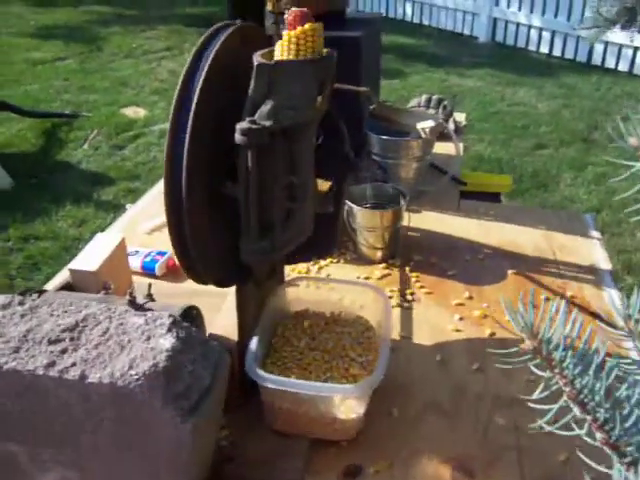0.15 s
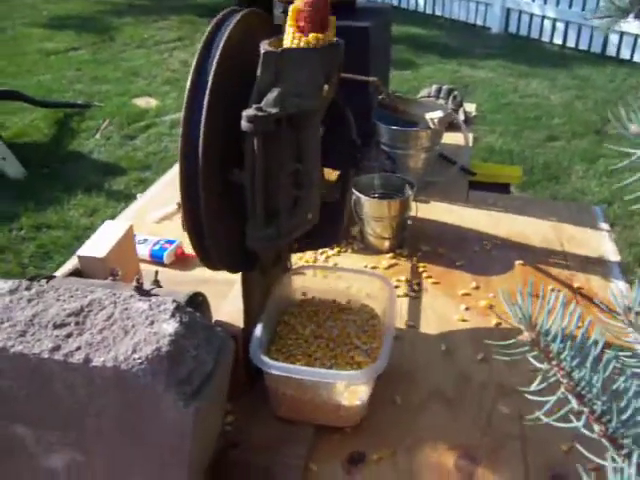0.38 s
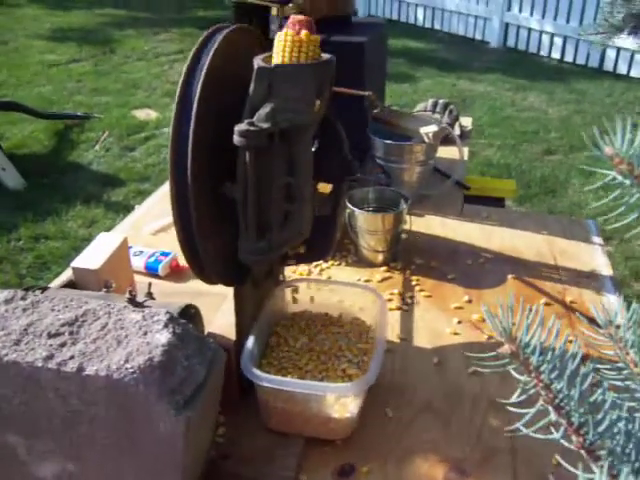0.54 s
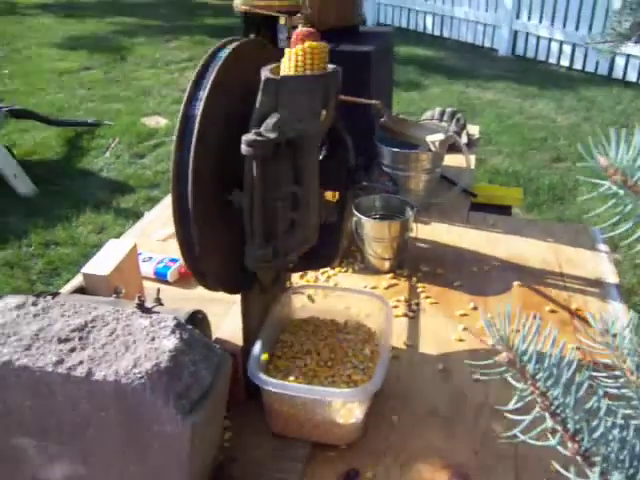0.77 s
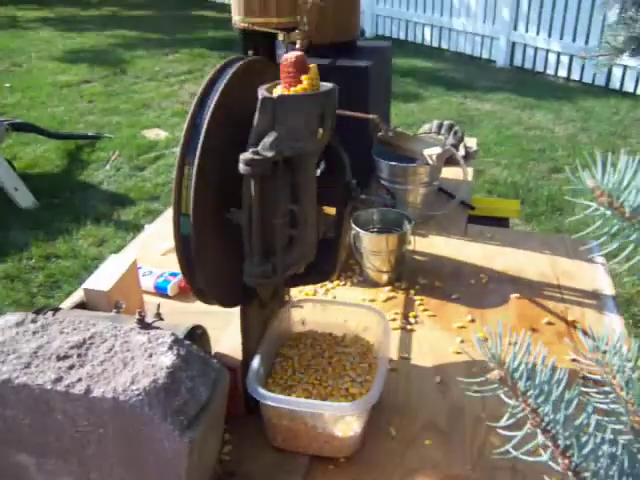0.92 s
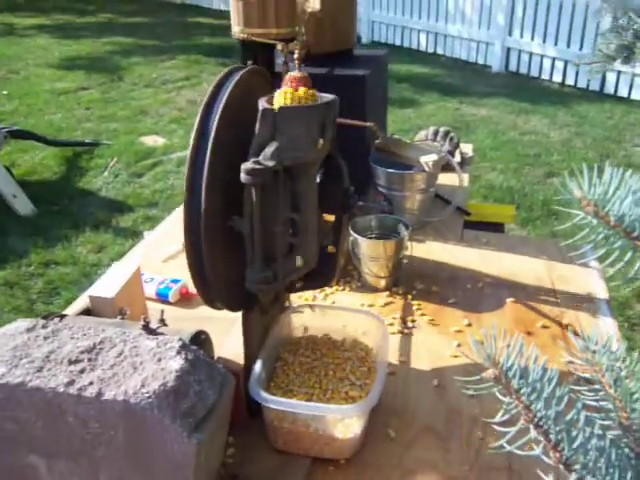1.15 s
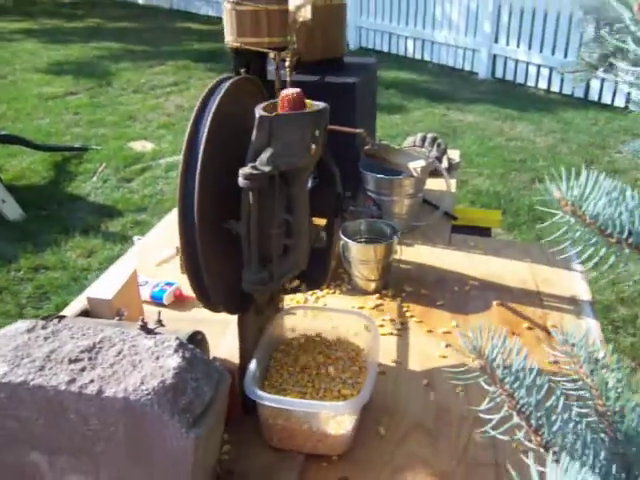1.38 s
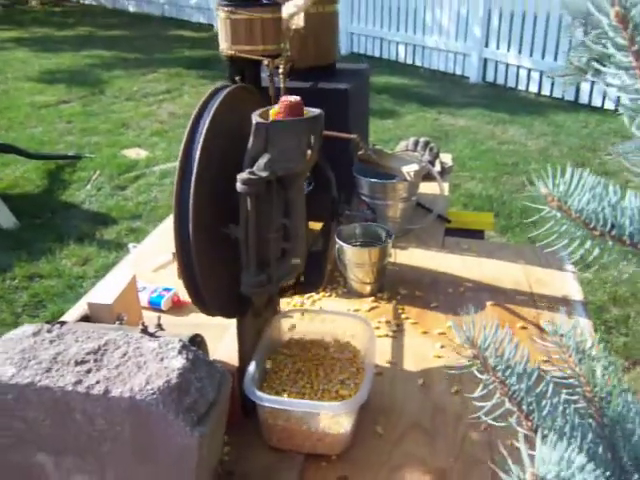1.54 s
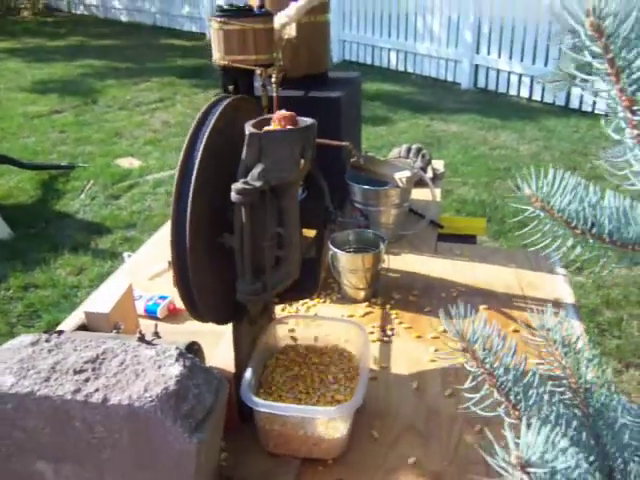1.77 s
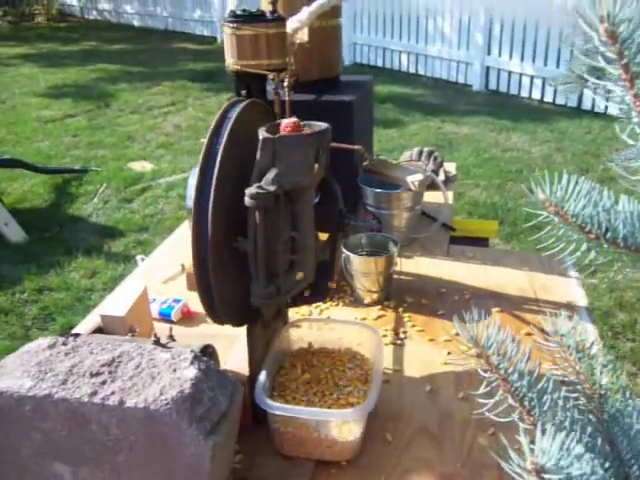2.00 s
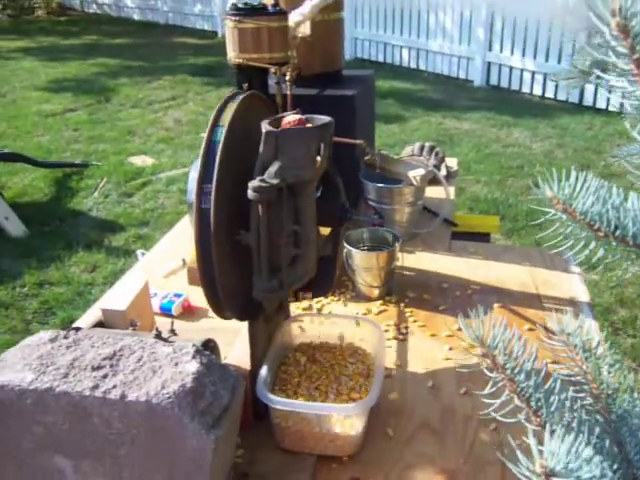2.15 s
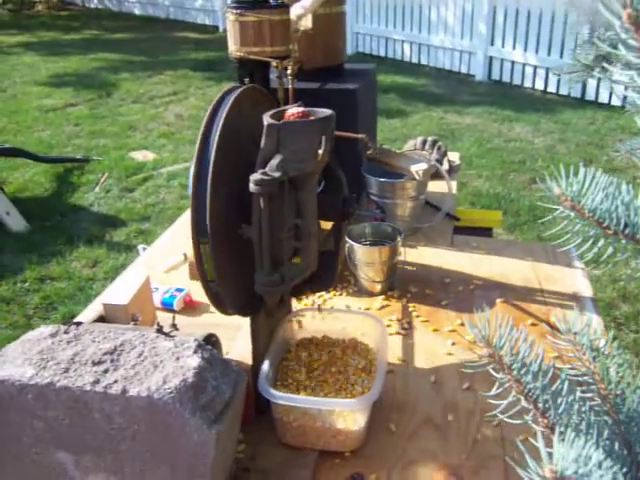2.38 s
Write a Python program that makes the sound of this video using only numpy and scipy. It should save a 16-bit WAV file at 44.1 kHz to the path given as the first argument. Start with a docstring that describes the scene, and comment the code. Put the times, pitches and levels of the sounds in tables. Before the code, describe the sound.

A corn sheller grinds a dry cob in fast, uneven, grainy bites with ringing iron, short squeals and sharp kernel snaps; wooden table thumps beneath, faint steam hiss, outdoors, close small camera microphone with dull treble.

```python
"""Steam-driven corn sheller

A small steam engine turns a cast-iron corn sheller. Teeth bite along a dry ear in bursts of grainy rasp and set
the iron ringing; now and then a disc mode squeals. Kernels snap off as short splintery clicks with an echo
off the table top, stray pieces knock and ping, and the cob scrunches and cracks as filtered grains.
The wooden table thumps and shakes in its own modes, over shaped-noise drive rumble and a steady hiss of steam."""
import sys
import numpy as np
from scipy import signal
from scipy.fft import rfft, irfft, next_fast_len
from scipy.io import wavfile
from scipy.ndimage import map_coordinates

SR = 44100
rng = np.random.default_rng(int(sys.argv[2]) if len(sys.argv) > 2 else 0)


def pcm_store(signal):
    """Save signal as 16-bit PCM."""
    levels = np.round(np.clip(np.atleast_2d(signal), -1, 1) * 32767)
    wavfile.write(sys.argv[1], SR, levels.astype(np.int16).T)


N = 111132  # length [samples]

# Levels in the tables are those ahead of each layer's trim and the microphone.
# How hard the disc grinds: (time [s], level [dB])
GRIND_LEVEL = [(0, -13), (0.035, -25.5), (0.07, -33), (0.125, -25), (0.185, -23.5), (0.24, -32),
               (0.272, -22), (0.315, -29), (0.405, -25.5), (0.435, -26.5), (0.46, -23.5), (0.515, -32),
               (0.545, -35.5), (0.6, -29), (0.64, -27.5), (0.705, -25.5), (0.785, -26), (0.805, -35),
               (0.865, -23), (0.93, -22), (0.96, -28), (1.02, -26.5), (1.075, -26), (1.16, -25.5),
               (1.25, -25), (1.305, -31.5), (1.35, -28), (1.42, -24.5), (1.485, -34.5), (1.57, -31),
               (1.65, -27.5), (1.79, -30.5), (1.96, -26), (2.1, -27.5), (2.175, -25), (2.2, -35),
               (2.23, -32.5), (2.26, -20.5), (2.295, -34), (2.35, -26.5), (2.385, -37), (2.425, -38.5),
               (2.455, -30), (2.52, -35.5)]
# Kernels snapping off and striking: (time [s], peak [dB], centre [Hz], length [s])
KERNEL_SNAPS = [(0.0514, -7.5, 5300, 0.0087), (0.119, -9.5, 4630, 0.0076), (0.1957, -11.5, 4660, 0.0053),
                (0.385, -17.5, 3230, 0.0064), (0.4594, -12.5, 4500, 0.0034), (0.486, -2.5, 3510, 0.0077),
                (0.5044, -5.5, 4790, 0.01), (0.531, -9, 4300, 0.0046), (0.5887, -12.5, 3480, 0.0046),
                (0.7853, -9.5, 3980, 0.004), (0.7912, -1, 3510, 0.0036), (0.941, -9, 4270, 0.0017),
                (0.9715, -5.5, 3700, 0.0033), (1.01, -12.5, 4080, 0.0104), (1.094, -1, 4350, 0.0055),
                (1.236, -9.5, 4620, 0.0045), (1.332, -7.5, 3990, 0.016), (1.3735, -8.5, 4300, 0.004),
                (1.4518, -1, 4100, 0.0062), (1.4677, -4.5, 4300, 0.004), (1.5006, -5, 4300, 0.0056),
                (1.51, -8.5, 4180, 0.013), (1.59, -10.5, 4220, 0.0078), (1.632, -13.5, 3800, 0.0036),
                (1.6496, -8, 3980, 0.0065), (1.717, -6.5, 4400, 0.0028), (1.81, -14.5, 3610, 0.0051),
                (1.8435, -10.5, 3250, 0.0053), (1.8563, -10, 4480, 0.0035), (1.909, -4, 3500, 0.0041),
                (2.023, -4, 4400, 0.011), (2.1403, -12, 3880, 0.008), (2.1866, -7, 3560, 0.0053),
                (2.273, -5, 3600, 0.0025), (2.3588, -5, 4170, 0.0076), (2.3646, -1.5, 4250, 0.0053),
                (2.3935, -5.5, 5100, 0.0052), (2.4347, -5, 4630, 0.0036), (2.493, -12.5, 3630, 0.011)]
# The cob cracking against the teeth: (time [s], peak [dB], length [s])
COB_CRACKS = [(0.3806, -16.5, 0.0065), (0.411, -24, 0.0073), (0.456, -20, .005), (0.4837, -18, 0.01),
              (0.502, -20.5, 0.012), (.791, -23.5, .004), (1.009, -19.5, 0.0089), (1.096, -21.5, 0.0054),
              (1.3324, -17.5, 0.018), (1.6343, -23, 0.016), (1.81, -22, 0.0081), (1.8436, -19.5, 0.01),
              (1.98, -23, 0.013), (2.0115, -20.5, 0.01), (2.164, -26, .01), (2.259, -28, 0.014),
              (2.447, -27, 0.016)]
# Jolts of the table: (time [s], peak [dB])
TABLE_THUMPS = [(0.462, -33), (0.834, -28.5), (1.229, -23.5), (1.345, -27.5), (1.99, -27.5), (2.046, -28.5),
                (2.125, -26)]
# Scrunch of the turning cob: (time [s], level [dB])
SCRUNCH_LEVEL = [(0, -38.5), (0.25, -35), (0.57, -41), (0.68, -35.5), (0.81, -37.5), (1.13, -38),
                 (1.18, -45.5), (1.23, -32), (1.43, -35), (1.51, -43), (1.64, -34.5), (1.75, -43.5),
                 (2.02, -38), (2.3, -44), (2.52, -49.5)]
# Shaking of the table: (time [s], level [dB])
SHAKE_LEVEL = [(0, -42.5), (0.3, -44.5), (0.47, -41.5), (0.57, -42), (0.7, -42), (0.95, -47.5), (1.17, -43),
               (1.35, -36.5), (1.52, -45.5), (1.68, -43.5), (1.85, -48.5), (2.1, -40), (2.42, -52.5)]
# Modes of the table: (frequency [Hz], energy [dB], t60 [s])
TABLE_MODES = [(96.7, -3, 0.21), (149.8, -0.5, .2), (173, 1, 0.18), (284, -10, 0.045),
               (357.5, -15.5, 0.054)]
# The three modes in which the disc can sing
LOW_HZ, MID_HZ, HIGH_HZ = 2853, 4305, 5995
# Squeals of the rubbing disc: (middle [s], rms at the middle [dB], half length [s], mode [Hz])
DISC_SQUEALS = [(0.092, -33, 0.023, MID_HZ), (0.225, -33, 0.018, MID_HZ), (0.279, -26, 0.014, LOW_HZ),
                (0.286, -28.5, 0.02, MID_HZ), (0.347, -28.5, 0.03, MID_HZ), (0.346, -33.5, 0.023, HIGH_HZ),
                (0.388, -34.5, 0.053, LOW_HZ), (0.426, -31, 0.019, HIGH_HZ), (0.467, -27, 0.023, MID_HZ),
                (1.02, -26.5, 0.012, MID_HZ), (1.153, -30.5, 0.012, HIGH_HZ), (2.036, -33, 0.077, MID_HZ),
                (2.149, -34, 0.031, HIGH_HZ), (2.313, -35, 0.014, HIGH_HZ)]
# Dull knocks in the plastic tub and on the table: (time [s], peak [dB], mode [Hz])
DULL_KNOCKS = [(.008, -23.5, 593), (1.125, -24.5, 872), (1.342, -27.5, 325), (1.978, -29, 290),
               (1.982, -25, 1010), (2.01, -28, 270), (2.053, -28, 320), (2.256, -22.5, 745)]
# Kernels pinging off metal: (time [s], peak [dB], mode [Hz])
METAL_PINGS = [(.508, -16.5, 4680), (2.174, -21, 4700)]
# Modes of the iron, one list per column: (frequency [Hz]), (energy [dB]), (t60 [s])
IRON_MODE_HZ = [2852, 4291, 4334, 4710, 4830, 4925, 5992]
IRON_MODE_DB = [3, 1.5, 5, -7, -3.5, -3.5, -4]
IRON_MODE_T60_S = [0.061, 0.28, 0.24, 0.088, .07, .08, 0.077]
# Tone colours of the rasp, scrunch, cracks, drive and steam: (frequency [Hz], gain [dB])
CRUNCH_COLOUR = [(300, -20.5), (1000, -15), (2350, -8.5), (2600, -3), (3020, -7), (3350, 1), (3750, -8),
                 (4200, -3), (4500, -6.5), (4850, 4.5), (5150, -4.5), (5900, -4.5), (6300, -17)]
SCRUNCH_COLOUR = [(100, -27), (250, 0.5), (480, -3.5), (720, 3.5), (1250, -10), (2500, -5), (6500, -9.5)]
CRACK_TONE = [(100, -12.5), (400, 3), (750, 10), (1300, 4.5), (2200, 8.5), (3500, -5.5), (6500, -16.5)]
RUMBLE_COLOUR = [(30, -21), (65, -7), (97, 1), (300, -16.5), (2000, -50.5)]
STEAM_COLOUR = [(100, -12.5), (700, -3.5), (1400, -8), (3000, 0), (7000, -5.5)]
# The microphone's response, thin in the deep bass and steep in the treble: (frequency [Hz], gain [dB])
MIC_RESPONSE = [(20, -12.5), (60, -1), (6050, 1), (6350, -3.5), (6550, -13.5), (6800, -31), (7100, -45)]

# grinding: grains of the rasp, smooth rub under them, kernels rattling on the iron
GRAINS_PER_S, GRAIN_SPREAD_DB, RUB_DB, CRUNCH_DB = 2200, 2.5, -3.5, -1.5
RATTLE_PER_S, RATTLE_SPREAD_DB, RING_DB = 400, 5.5, -8
# teeth: rate, timing scatter (share of a tooth), decay and size scatter of a bite, drag between bites
TOOTH_PER_S, TOOTH_SLIP, BITE_S, BITE_SPREAD_DB, DRAG_DB = 74, .42, 0.0064, 2, -8.5
SQUEAL_WAVER_HZ, SQUEAL_WAVER_PER_S = 20, 90
# snaps: resonance width, splinters against a break of 3, unfiltered body, trim; then the echo
SNAP_WIDTH_HZ, SNAP_SPLINTER, SNAP_BODY_DB, SNAP_DB = 1960, 0.26, -15, -1
ECHO_S, ECHO_DB = 0.001398, -4.5
SCUFF_S, KNOCK_T60_S, PING_T60_S = 0.0077, 0.038, .06
# cob: CRACK_BREAK adds a first break ahead of the fibres
SCRUNCH_PER_S, SCRUNCH_SPREAD_DB, SCRUNCH_DB = 600, 3.5, 2.5
CRACK_BREAK, CRACK_DB = 5.2, 4
# table: JOLT_S is how long a jolt presses
JOLT_S, THUMP_DB, BOOM_DB = 0.0039, 1, 1.5
RUMBLE_DB, STEAM_DB = -50.5, -40.5  # rms
CLIP_TOP, CLIP_HARDNESS, TOP_HZ = 0.75, 10, 7200


def amp(db):
    """Decibels to gain."""
    return 10 ** (np.asarray(db) / 20)


def unit(x):
    """Scale to rms 1."""
    return x / np.sqrt(np.mean(x ** 2) + 1e-20)


def level(rows):
    """Gain per sample, drawn straight in decibels between (time [s], level [dB]) points."""
    return amp(np.interp(np.arange(N) / SR, *np.transpose(rows)))


def coloured(x, points):
    """Minimum-phase filter through (frequency [Hz], gain [dB]) points, so nothing sounds early."""
    m = 2 * next_fast_len(len(x) // 2 + 4096)
    hz, db = np.transpose(points)
    log_hz = np.log(np.fft.rfftfreq(m, 1 / SR) + 1)
    gain = amp(np.interp(log_hz, np.log(hz), db))
    # folding the cepstrum onto positive times makes the filter causal
    cepstrum = irfft(np.log(gain), m)
    cepstrum[1:m // 2] *= 2
    cepstrum[m // 2 + 1:] = 0
    response = np.exp(rfft(cepstrum))
    return irfft(rfft(x, m) * response, m)[:len(x)]


def contacts(per_s, spread_db, size=N):
    """Tiny impacts at random moments, of random sign and uneven strength, at rms 1."""
    struck = rng.random(size) < per_s / SR
    strength = np.minimum(rng.standard_normal(size), 2)
    side = np.sign(rng.standard_normal(size))
    return unit(struck * side * amp(spread_db * strength))


def ringing(modes):
    """One blow's ring: decaying sines, each scaled by its t60 so that dB sets its energy."""
    t = np.arange(SR // 2) / SR
    return sum(amp(db - 60 * t / t60) / np.sqrt(t60) * np.sin(2 * np.pi * hz * t)
               for hz, db, t60 in modes)


def add(track, s, sound, db):
    """Drop a sound into the track at time s [s] with the given peak [dB]."""
    part = track[max(round(s * SR), 0):][:len(sound)]
    part += amp(db) * sound[:len(part)] / np.abs(sound).max()


def wobble(per_s):
    """A smooth random curve through per_s random points a second."""
    return map_coordinates(rng.standard_normal(N // 50), [np.arange(N) * per_s / SR])


def grinding():
    """Each bite rasps over the ear in a burst of grains and throws kernels against the ringing iron."""
    force = bites()
    rub = amp(RUB_DB) * rng.standard_normal(N)
    rasp = contacts(GRAINS_PER_S, GRAIN_SPREAD_DB) + rub
    crunch = unit(coloured(rasp * force, CRUNCH_COLOUR))
    rattle = force * contacts(RATTLE_PER_S, RATTLE_SPREAD_DB)
    iron_modes = zip(IRON_MODE_HZ, IRON_MODE_DB, IRON_MODE_T60_S)
    iron = unit(signal.fftconvolve(rattle, ringing(iron_modes))[:N])
    return level(GRIND_LEVEL) * (amp(CRUNCH_DB) * crunch + amp(RING_DB) * iron)


def bites():
    """Tooth after tooth catches the ear unevenly: the force jumps at each bite, then decays towards the drag."""
    late, strength = rng.uniform(-1, 1, (2, int(2 * TOOTH_PER_S * N / SR)))
    tooth = np.arange(len(late)) + 1 + TOOTH_SLIP * late
    at = (tooth * SR / TOOTH_PER_S).astype(int)
    hits = np.bincount(np.abs(at), amp(BITE_SPREAD_DB * strength), N)[:N]
    decay = np.exp(-1 / (BITE_S * SR))
    return amp(DRAG_DB) + signal.lfilter([1], [1, -decay], hits)


def squeal():
    """Friction makes one mode of the disc or another sing for a moment, its pitch wavering."""
    t = np.arange(N) / SR
    waver = 2 * np.pi * np.cumsum(SQUEAL_WAVER_HZ * wobble(SQUEAL_WAVER_PER_S)) / SR
    out = np.zeros(N)
    for s, db, half, hz in DISC_SQUEALS:
        swell = np.exp(-((t - s) / half) ** 2)
        out += amp(db) * swell * unit(np.sin(2 * np.pi * hz * t + waver))
    return out


def kernels():
    """Each snap is a sharp break and a few splinters in a damped resonance, echoed by the table top."""
    out, t = np.zeros(N), np.arange(SR // 25) / SR
    band = signal.butter(1, [2300, 6500], "band", fs=SR)
    treble_cut = signal.butter(6, 6700, fs=SR)
    for s, db, hz, length in KERNEL_SNAPS:
        push = SNAP_SPLINTER * contacts(8800, 3.4, size=len(t)) * np.exp(-2 * t / length)
        push[0] += 3  # the break itself
        ring = signal.lfilter(*signal.iirpeak(hz, hz / SNAP_WIDTH_HZ, SR), push)
        snap = signal.lfilter(*band, ring) + amp(SNAP_BODY_DB) * push
        snap = signal.lfilter(*treble_cut, snap)
        add(out, s, snap, db + SNAP_DB)
        echo_delay = ECHO_S * rng.uniform(.85, 1.117)
        add(out, s + echo_delay, snap, db + SNAP_DB + ECHO_DB)
    return out


def stray_kernels():
    """Knocks in the tub and on the table and pings off metal: a short scuff drives one ringing mode."""
    out, t = np.zeros(N), np.arange(SR // 50) / SR
    for rows, t60 in ((DULL_KNOCKS, KNOCK_T60_S), (METAL_PINGS, PING_T60_S)):
        for s, db, hz in rows:
            scuff = rng.standard_normal(len(t)) * np.exp(-t / SCUFF_S)
            add(out, s, signal.fftconvolve(scuff, ringing([(hz, 0, t60)])), db)
    return out


def cob():
    """The turning cob scrunches in fine grains; a dull crack is one break and a tail of snapping fibres."""
    out, t = np.zeros(N), np.arange(SR // 10) / SR
    for s, db, length in COB_CRACKS:
        fibres = contacts(4000, 3.3, size=len(t)) * np.exp(-2 * t / length)
        fibres[0] += CRACK_BREAK
        add(out, s, coloured(fibres, CRACK_TONE), db + CRACK_DB)
    grains = contacts(SCRUNCH_PER_S, SCRUNCH_SPREAD_DB)
    scrunch = unit(coloured(grains, SCRUNCH_COLOUR))
    return out + amp(SCRUNCH_DB) * level(SCRUNCH_LEVEL) * scrunch


def table():
    """Noise shakes the modes of the table top, and each jolt is one soft push that sets them booming."""
    out = np.zeros(N)
    boom = signal.lfilter(*signal.butter(2, 100, "high", fs=SR), ringing(TABLE_MODES))
    t = np.arange(SR // 50) / SR
    push = np.sin(np.pi * np.minimum(t / JOLT_S, 1))  # half a sine
    for s, db in TABLE_THUMPS:
        add(out, s, signal.fftconvolve(push, boom), db + THUMP_DB)
    shaking = unit(signal.fftconvolve(rng.standard_normal(N), boom)[:N])
    return out + amp(BOOM_DB) * level(SHAKE_LEVEL) * shaking


def drive_rumble():
    """The drive rumbles as steady noise weighted to the bass."""
    return amp(RUMBLE_DB) * unit(coloured(rng.standard_normal(N), RUMBLE_COLOUR))


def steam():
    """Escaping steam is turbulence: a steady, shaped noise."""
    return amp(STEAM_DB) * unit(coloured(rng.standard_normal(N), STEAM_COLOUR))


def scene():
    """Sheller, tub and table over the drive and the hiss of steam."""
    sheller = grinding() + squeal() + kernels() + stray_kernels() + cob()
    return (sheller + table() + drive_rumble() + steam())[None]


def record(dry):
    """A small camera microphone with little treble; peaks near CLIP_TOP overload and round off."""
    m = next_fast_len(N + SR // 4)
    x = coloured(dry[0], MIC_RESPONSE)
    x = x / (1 + np.abs(x / CLIP_TOP) ** CLIP_HARDNESS) ** (1 / CLIP_HARDNESS)
    low_pass = 1 / (1 + (np.fft.rfftfreq(m, 1 / SR) / TOP_HZ) ** 40)
    return irfft(rfft(x, m) * low_pass, m)[None, :N]


dry = scene()
out = record(dry)
pcm_store(out)
```